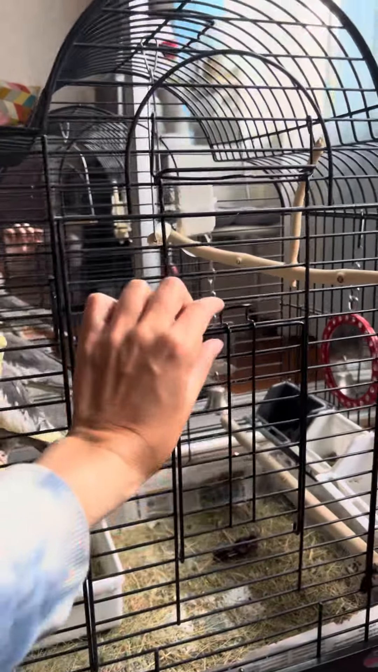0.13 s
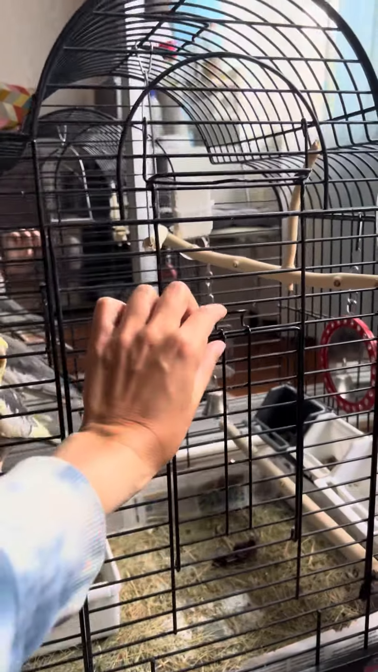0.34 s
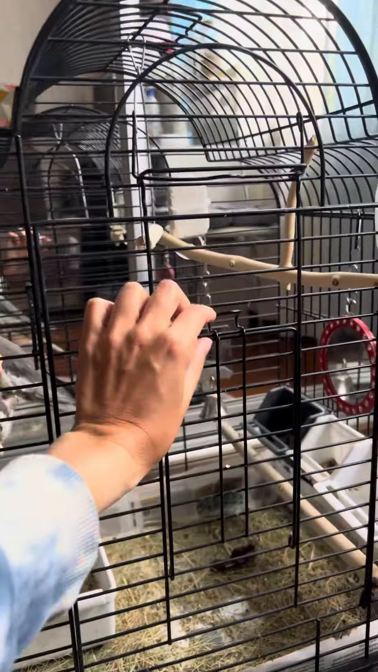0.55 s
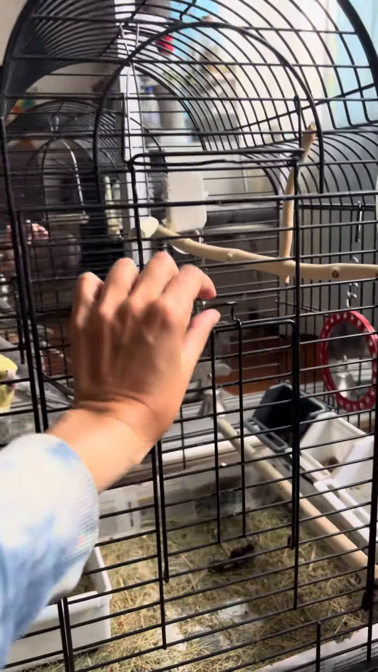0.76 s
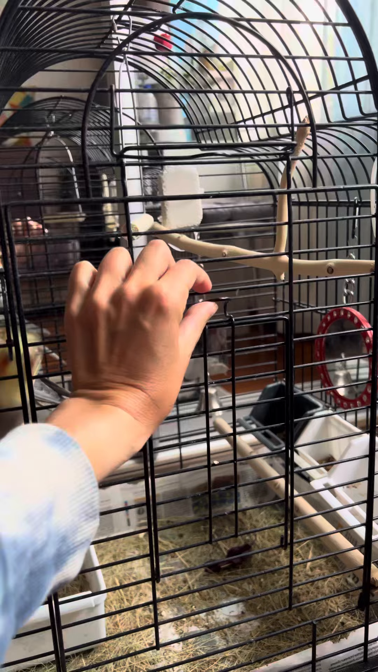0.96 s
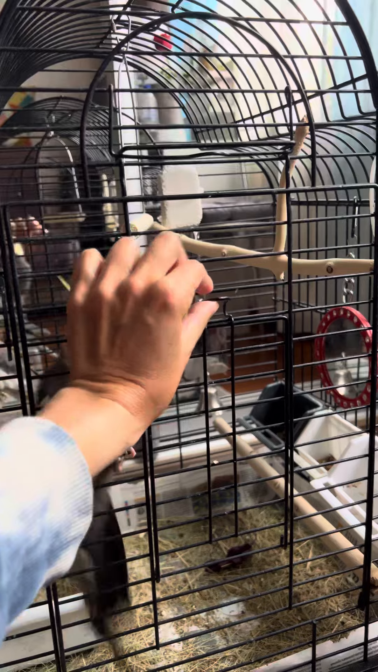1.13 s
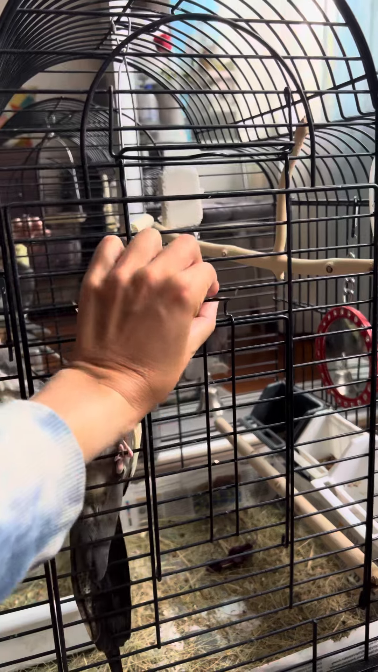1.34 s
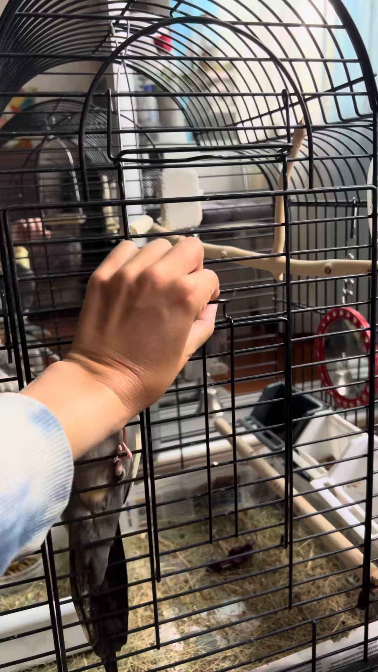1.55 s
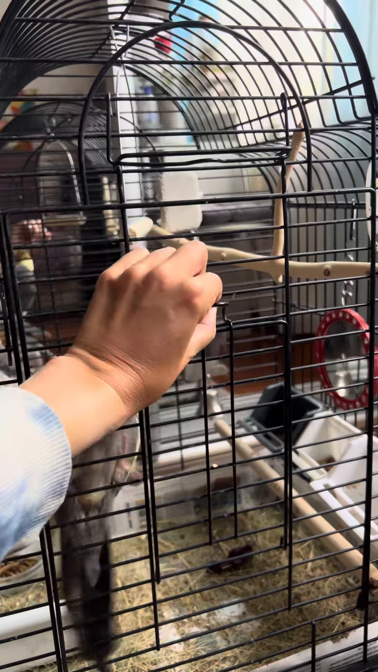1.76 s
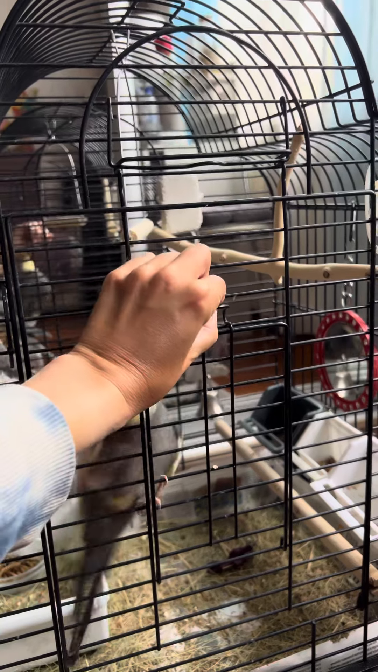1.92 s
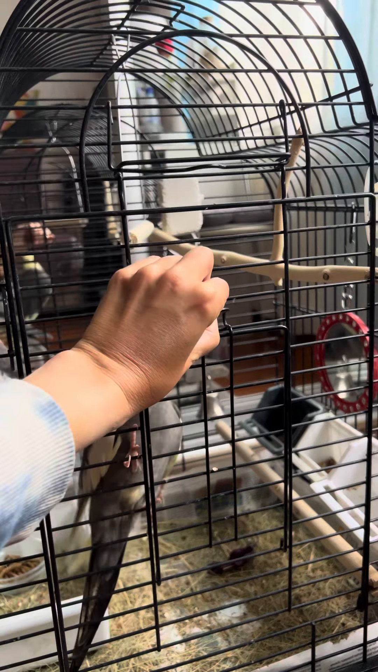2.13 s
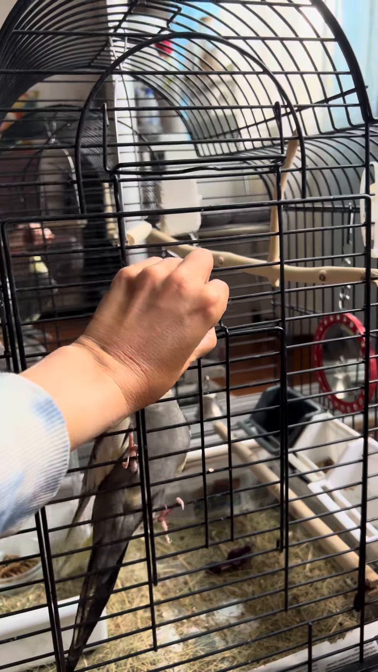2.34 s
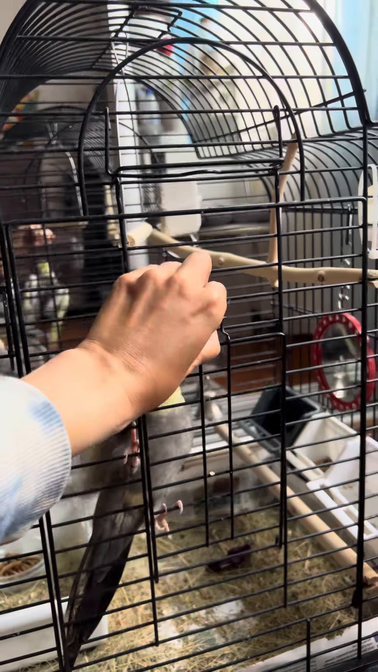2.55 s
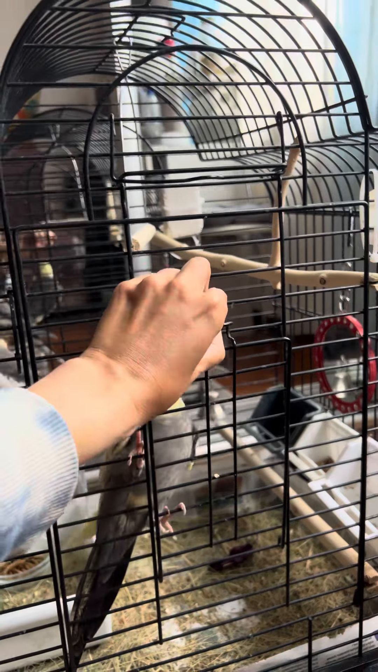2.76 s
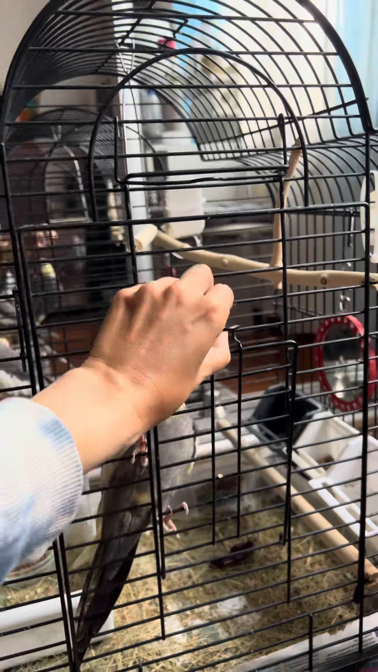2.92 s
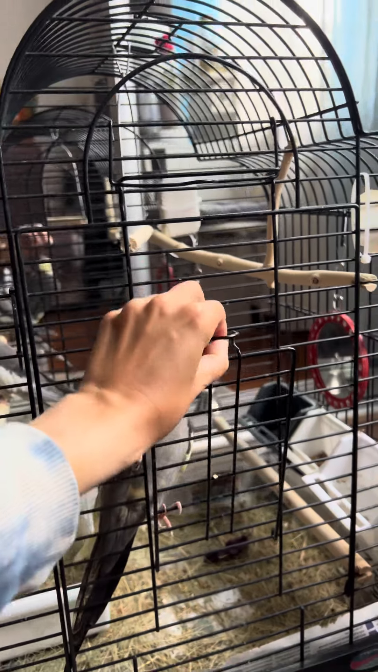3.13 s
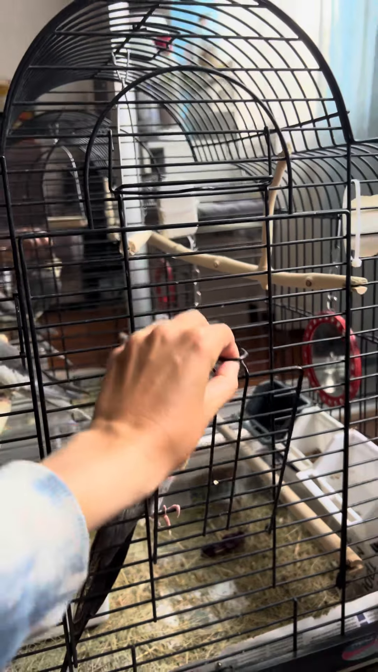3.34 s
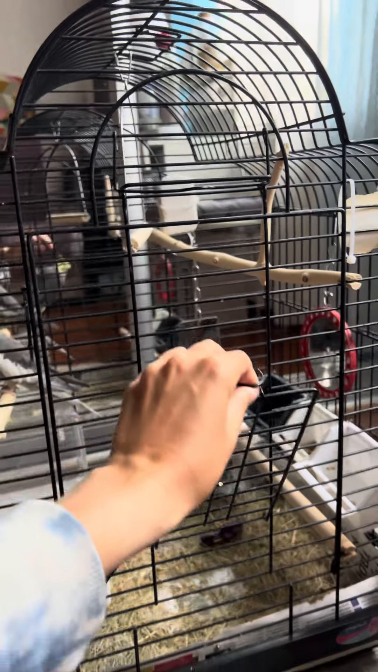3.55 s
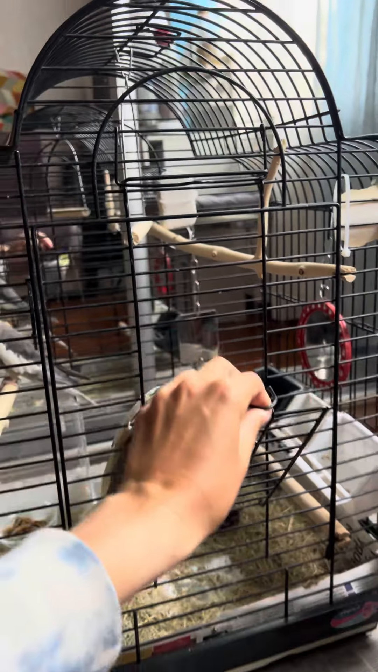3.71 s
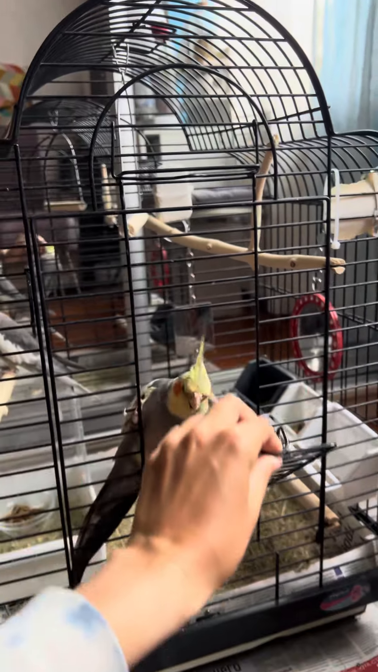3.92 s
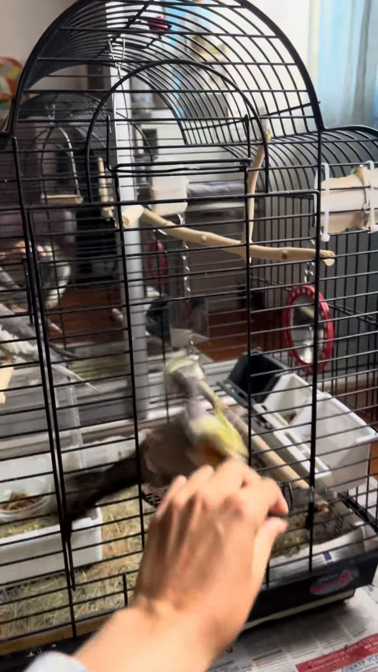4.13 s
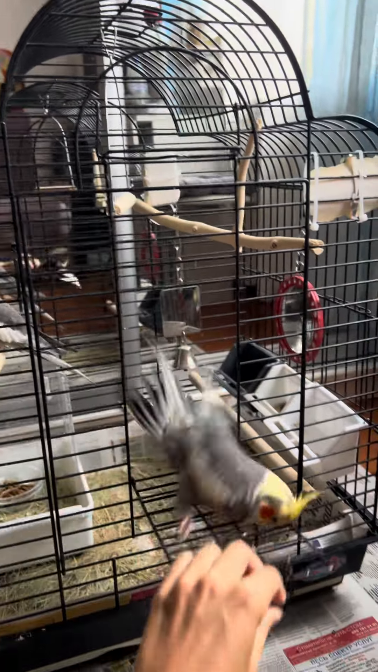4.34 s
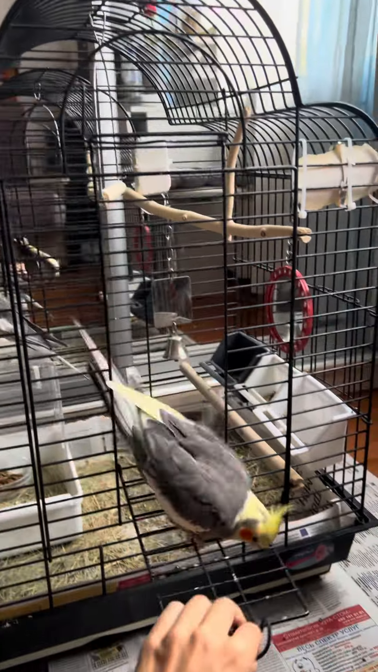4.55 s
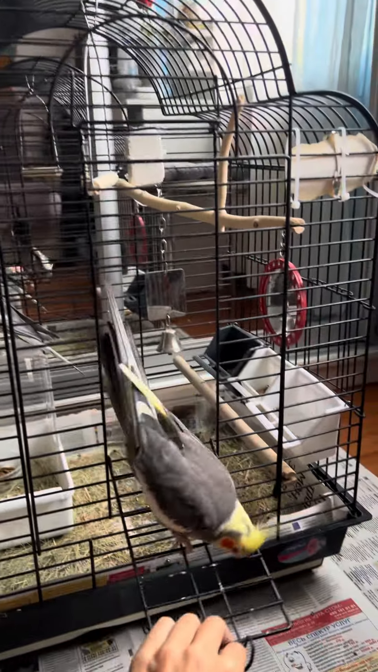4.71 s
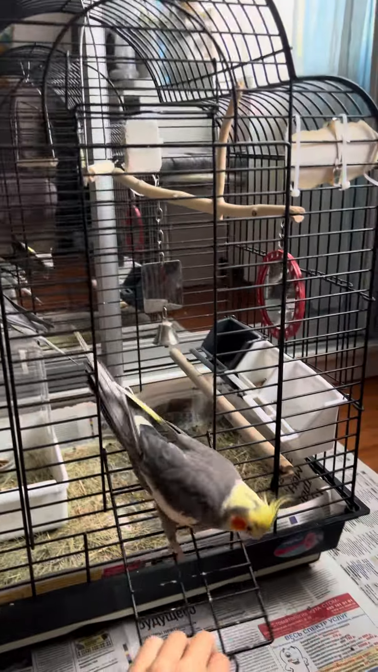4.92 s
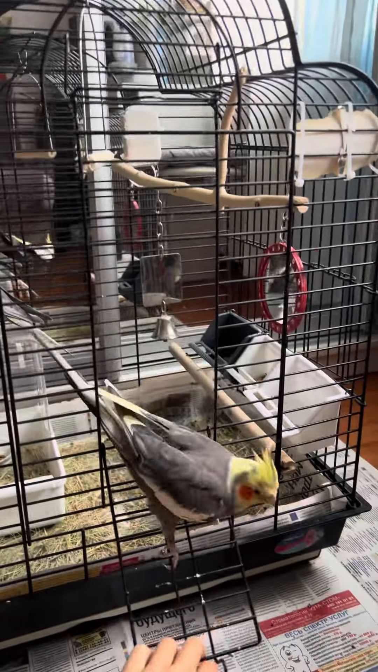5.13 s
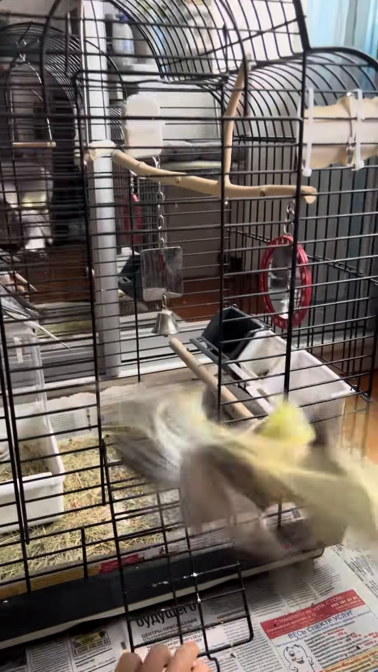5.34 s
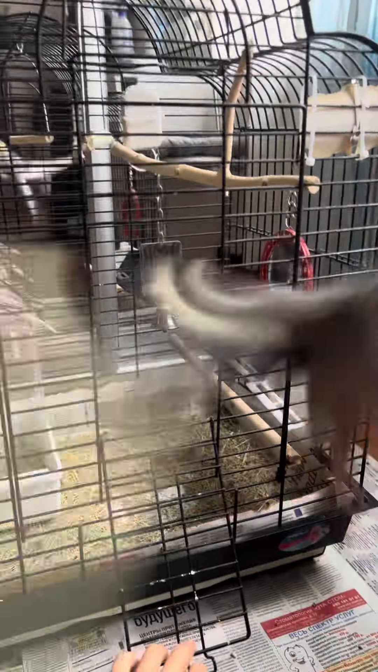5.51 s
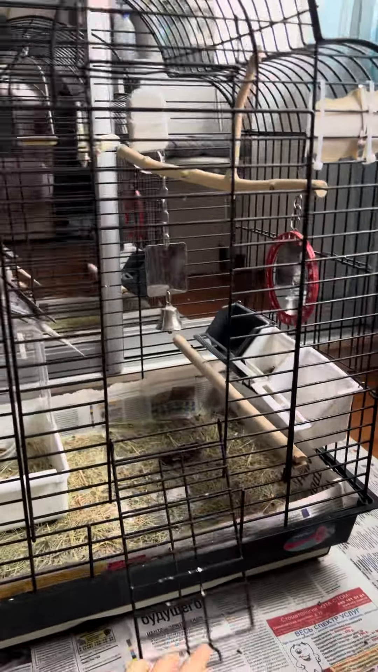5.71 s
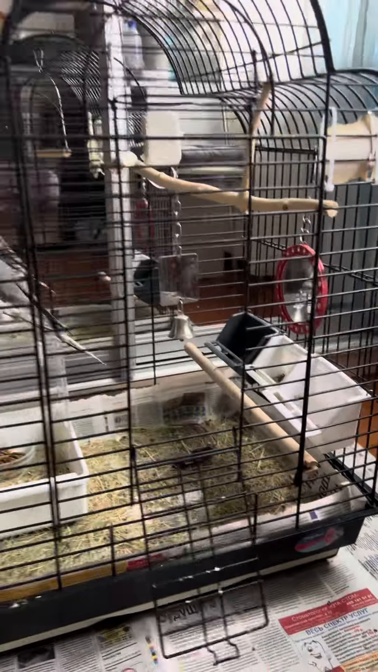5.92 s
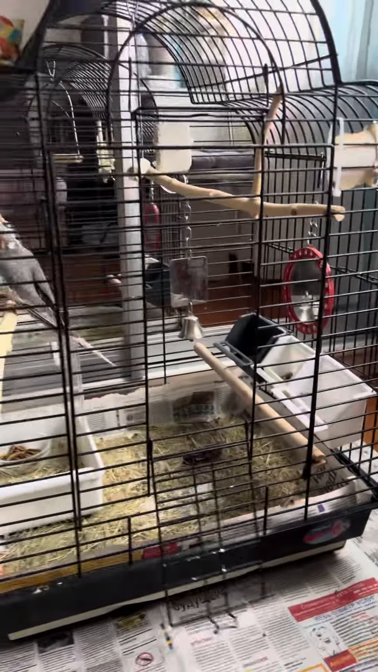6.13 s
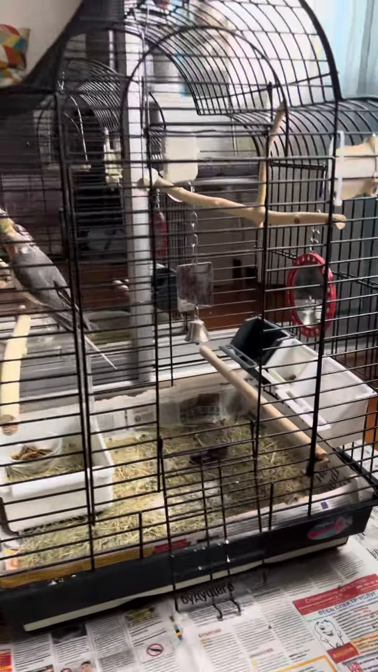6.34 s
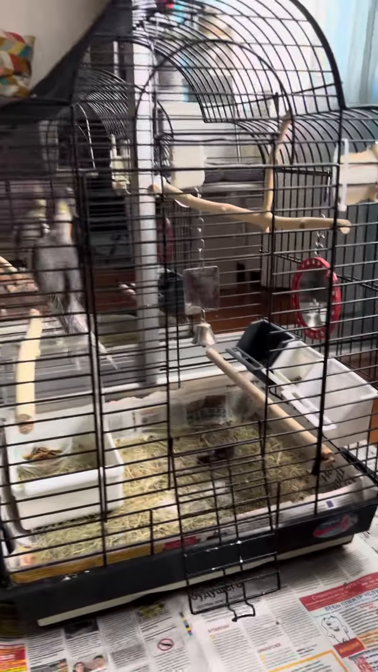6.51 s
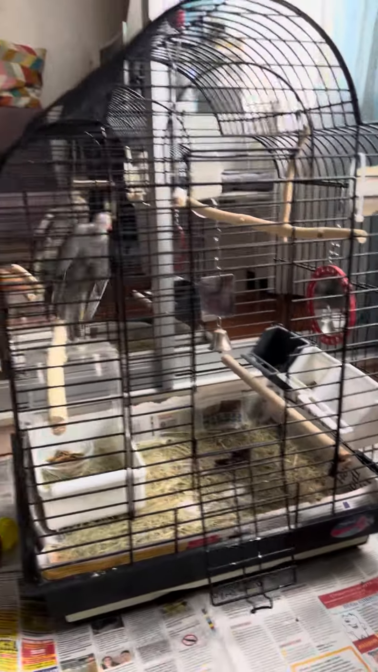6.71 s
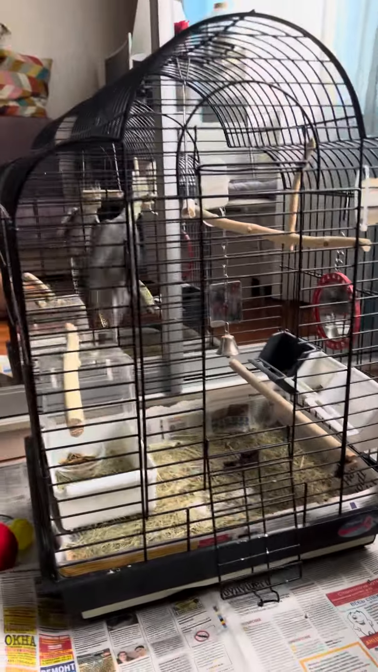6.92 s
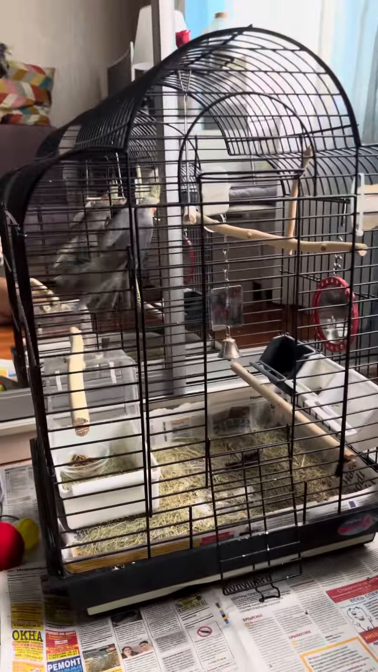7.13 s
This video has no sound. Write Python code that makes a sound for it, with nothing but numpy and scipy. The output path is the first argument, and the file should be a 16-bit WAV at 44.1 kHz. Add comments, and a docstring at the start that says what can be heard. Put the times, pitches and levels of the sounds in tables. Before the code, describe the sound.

Light metallic cage rattles, one sharp clank, a pause, then a bird's sudden wing burst buffets the microphone and fades into fluttering and wire pings.

```python
"""Cage bird passing a microphone

A hand unlatches and lowers the wire door of a cockatiel's cage in a humming room: knocks excite decaying
bar modes, and scrapes are grainy noise. The bird takes off and flies past the microphone: its feathers are
throbbing noise, its close wing strokes brief pressure swings, and one wing tip clips the microphone with a
snap and a falling thump. Then it flutters and scrabbles on wire further away."""
import sys
import numpy as np
from scipy import signal
from scipy.fft import rfft, irfft
from scipy.io import wavfile
from scipy.ndimage import uniform_filter1d

SR = 44100
rng = np.random.default_rng(int(sys.argv[2]) if len(sys.argv) > 2 else 0)


def materialize(psi):
    """Save the field psi as 16-bit PCM at rate SR to the path in sys.argv[1].

    A 1-D psi becomes a single channel; in a 2-D psi each row is a channel.
    """
    bounded = np.clip(np.atleast_2d(psi).T, -1, 1)
    quanta = np.round(bounded * 32767).astype(np.int16)
    wavfile.write(sys.argv[1], SR, quanta)


N = 316197
TIME = np.arange(N) / SR

TIP_S = 5.5972  # moment a wing tip clips the microphone

# spectrum of the snap on the casing: pitch_hz [Hz], level_db [relative dB per Hz]
SNAP_SPECTRUM = [(200, -30), (600, -7), (900, -12), (1300, 6), (1900, -2.5), (2700, -4.5), (4800, -2.5),
                 (5900, -18), (9500, -16), (12000, -23), (16000, -29)]


def wing_tip(thump_db=-1.2, snap_db=-3.0, start_hz=560, fall_s=0.0032, late_s=0.00189,
             length_s=0.0078, spread_s=0.000705, bounce_s=.00093):
    """Impact and dispersion: a snap with its rebound, and a thump whose pitch plunges as pressure lets go."""
    t = TIME[:2048]
    hz = np.fft.rfftfreq(2048, 1 / SR)
    # the integral of start_hz / (1 + t / fall_s), slightly higher at the right port
    turns = start_hz * fall_s * np.log(1 + t / fall_s) * np.array([[1], [1.015]])
    thump = -np.sin(2 * np.pi * turns) * np.exp(-(t / length_s) ** 3)
    # bending waves in the casing are dispersive: the treble arrives first
    phase_lag = 4 * np.pi * spread_s * np.sqrt(1000 * hz) * np.array([[1], [.94]])
    snap = irfft(amp(read(SNAP_SPECTRUM, hz)) * np.exp(-1j * phase_lag))[:, :512]
    snap *= amp(snap_db) / abs(snap).max()
    out = np.zeros((2, N))
    add(out, TIP_S, snap)
    add(out, TIP_S + bounce_s, -snap)
    add(out, TIP_S + late_s, amp(thump_db) * thump)
    return out


# gusts of single wing strokes: start_s [s], level_db [dB, gain of the swing], swing_hz [Hz], length_s [s]
STROKES = [(5.425, -20, 62, 0.028), (5.513, -1.5, 65, 0.033), (5.582, -15, 154, 0.015),
           (5.609, -13.5, 11, 0.032), (5.673, -25.5, 440, 0.0094), (5.674, -34.5, 1000, 0.012),
           (5.799, -21.5, 190, 0.018), (5.866, -14, 127.6, 0.033), (5.902, -15, 310, 0.011),
           (5.907, -12.5, 108, 0.028), (5.954, -26, 310, 0.01)]


def gusts(skew=0.49, rough_db=-24, lead_s=0.00036):
    """Near-field pressure: a close wing stroke sucks and pushes the diaphragm, the right port leading."""
    out = np.zeros((2, N))
    for start_s, level_db, swing_hz, length_s in STROKES:
        t = np.arange(0, length_s, 1 / SR)
        push = np.sin(np.pi * (t / length_s) ** abs(skew))  # rises faster than it falls
        eddies = noise(EDDY_SPECTRUM, size=SR)[:, :len(t)]
        swing = np.sin(2 * np.pi * swing_hz * (t + np.array([[0], [lead_s]])))
        add(out, start_s, amp(level_db) * push * (amp(rough_db) * eddies - swing))
    return out


# spectra of slow and of small-scale turbulence: pitch_hz [Hz], level_db [relative dB per Hz]
RUMBLE_SPECTRUM = [(15, -18), (35, -12.5), (58, 11.5), (90, -7), (140, -8.5), (250, -61), (600, -86)]
EDDY_SPECTRUM = [(60, -3), (150, 12.5), (280, 5), (450, 2), (700, -17.5), (1200, -23), (3000, -71)]
# wakes at the microphone when the bird is close: start_s [s], hold_s [s],
# rumble_db [dB before trim], eddies_db [dB before trim], rumble_fade [dB per s]
CLOSE_WAKES = [(5.315, 0.26, -33, -47, 120), (5.5, .1, -30, -36, 150), (5.614, 0.079, -26, -32, 330),
               (5.803, 0.11, -20.5, -26.5, 85)]
WAKE_RISE_S, EDDY_FADE_RATIO = 0.0079, 2.03  # small eddies die faster than the rumble
FAR_WAKE_DB = 0.5  # rumble relative to the whoosh column of a flutter


def draught(rumble_db=-2, eddies_db=-2):
    """Turbulence: the wake of the wings tumbles over the microphone; distant flutters only stir it."""
    slow = amp(FAR_WAKE_DB) * flutter(axis=3, fade=WHOOSH_FADE_DB_PER_S)
    quick = 0
    for start, hold, low_db, eddy_db, fade in CLOSE_WAKES:
        slow = np.maximum(slow, amp(low_db) * swell(start, hold, WAKE_RISE_S, fade))
        quick = np.maximum(quick, amp(eddy_db) * swell(start, hold, WAKE_RISE_S, fade * EDDY_FADE_RATIO))
    rumble = steady(noise(RUMBLE_SPECTRUM, size=N), size=1800) * slow
    eddies = steady(noise(EDDY_SPECTRUM, size=N), size=900) * quick
    return amp(rumble_db) * rumble + amp(eddies_db) * eddies


# spectra of brushing feathers and of fanned air: pitch_hz [Hz], level_db [relative dB per Hz]
SWISH_SPECTRUM = [(1180, -26), (2000, -11), (2760, -7.5), (3400, -6.5), (5350, -8), (9410, -3),
                  (12300, -19.5), (14900, -14), (16000, -16)]
WHOOSH_SPECTRUM = [(120, -3.5), (300, 2.5), (430, 4), (700, 0), (1000, -2), (1400, -1), (2100, -2.5),
                   (2700, -18), (5000, -86)]
BEATS_PER_S = 12.5
TAKEOFF_SWISH_DB, TAKEOFF_WHOOSH_DB = -45, -48  # before trim
SWISH_FADE_DB_PER_S, WHOOSH_FADE_DB_PER_S = 80, 38
TAKEOFF_S, WHOOSH_LAG_S = 5.254, 0.027


def feathers(swish_db=-2, whoosh_db=-1, beat_db=0.9, grain_db=2.0, uneven_db=1.45):
    """Amplitude modulation: swish and whoosh throb with the wingbeat; barbs catching make the swish grainy."""
    beat = beat_db * np.cos(2 * np.pi * BEATS_PER_S * (TIME - TIP_S))
    grain = grain_db * unit(uniform_filter1d(rng.standard_normal(N), size=90))
    brushing = flutter(axis=2, fade=SWISH_FADE_DB_PER_S)
    brushing = brushing + amp(TAKEOFF_SWISH_DB) * takeoff(TAKEOFF_S)
    fanning = flutter(axis=3, fade=WHOOSH_FADE_DB_PER_S)
    fanning = fanning + amp(TAKEOFF_WHOOSH_DB) * takeoff(TAKEOFF_S + WHOOSH_LAG_S)
    swish = noise(SWISH_SPECTRUM, size=N) * brushing * amp(swish_db + grain)
    whoosh = noise(WHOOSH_SPECTRUM, size=N) * fanning * amp(whoosh_db)
    # no two flaps are alike
    wander = uniform_filter1d(uniform_filter1d(rng.standard_normal(N), size=700), size=200)
    return (swish + whoosh) * amp(beat + uneven_db * unit(wander))


OPENING_S, PASSED_DB_PER_S = 0.017, 1500  # rise as the wings open, fade once the bird has passed


def takeoff(start):
    """Envelope of a source in flight: gain from the cage door to the microphone."""
    return swell(start, TIP_S - start, OPENING_S, PASSED_DB_PER_S)


# bouts of fluttering against the bars: start_s [s], hold_s [s],
# swish_db [dB before trim], whoosh_db [dB before trim]
FLUTTER_BOUTS = [(4.1, .13, -63, -63), (5.679, .1, -62, -57), (5.806, 0.044, -49, -43.5),
                 (6.071, 0.067, -49, -41.5), (6.345, 0.066, -47.5, -42.5), (6.491, 0.16, -49.5, -45),
                 (6.746, .12, -50.5, -47.5), (7.004, .03, -50, -57), (7.115, 0.056, -50.5, -61)]
FLUTTER_RISE_S = 0.023


def flutter(axis, fade):
    """Masking of overlapping bouts: the strongest one sets the gain, from one of their level columns."""
    bouts = [amp(row[axis]) * swell(row[0], row[1], FLUTTER_RISE_S, fade) for row in FLUTTER_BOUTS]
    return np.max(bouts, axis=0)


# spectra of the bright clatter and of the low tray: pitch_hz [Hz], level_db [relative dB per Hz]
CLATTER_SPECTRUM = [(300, -20), (1200, -3), (2500, -6), (4000, -4), (5300, -4), (7000, -1.5), (9500, 1.5),
                    (10500, -4.5), (11500, -26), (13000, -17.5), (14500, -14.5), (16000, -13)]
TRAY_SPECTRUM = [(40, -31.5), (90, -5), (200, -11), (300, -14), (430, -0.5), (650, -9), (950, -13),
                 (1300, -11), (2000, -14.5), (3000, -29), (8000, -45)]
# strongest modes of the bars: pitch_hz [Hz, before detuning], level_db [relative dB], t60_s [s]
WIRE_MODES = [(368, -5, 2.73), (452, 6, 1.4), (618, 0, .9), (703, -2.5, 1.1), (872, -4, 1.67),
              (1045, -10, 2.03), (1254, -7.5, 0.61), (1500, -23.5, 1.2), (1933, -4.5, 1.67),
              (2345, -7.5, 1.15), (7060, -10.5, .45), (7500, -11.5, 0.77)]
# knocks on the cage wires: start_s [s], clatter_db [dB gain], tray_db [dB gain], tick_db [dB gain],
# hardness_db [dB of extra top treble]
CAGE_KNOCKS = [(.453, -64, -54, -80, -18), (.572, -63.5, -61, -85, -18), (.872, -57, -55.5, -80, -15),
               (.915, -51.5, -50.5, -75, -22), (.95, -53, -50, -78, -4), (1.075, -47.5, -50.5, -56, -9),
               (1.123, -58, -50, -39.5, 13), (1.155, -57, -59, -46, 13), (1.19, -72, -55, -75, -5),
               (1.377, -64, -68, -58, -12), (1.655, -52.5, -47.5, -57, -2), (1.711, -50, -55, -49, 0),
               (1.733, -50, -52, -45, 2), (1.876, -60, -58, -52.5, 13.5), (1.987, -47, -43, -38.5, -14.5),
               (2.086, -53.5, -55, -59, -10), (2.361, -30.5, -33, -36, 11.5), (2.365, -27, -30.5, -21, 7.5),
               (2.395, -48, -33, -50, -3.5), (2.452, -50, -56, -29.5, -7), (2.511, -42, -52, -32, 5),
               (2.588, -45.5, -63, -37, -4.5), (4.045, -56, -41.5, -57, 11.5),
               (4.147, -49.5, -50.5, -48.5, 10), (4.2016, -47, -49.5, -31.5, 9.5),
               (4.405, -61, -52, -57, 10), (4.428, -61, -51, -62, 0), (4.561, -56.5, -53, -49, -9.5),
               (4.745, -61.5, -57, -60, 6.5), (5.255, -47, -69, -34, 6), (5.285, -56, -50, -55, -4),
               (5.514, -60, -54, -33.5, 11), (5.8, -45, -58, -49, 4), (5.928, -46, -62, -44, -2),
               (6.069, -40.5, -52, -55, -14), (6.095, -45, -40, -54, -5.5), (6.26, -47, -60, -45, 3),
               (6.38, -42.5, -45, -50, -10), (6.491, -42.5, -54, -36.5, -10), (6.6, -43, -46, -47, -4),
               (6.84, -48.5, -57, -39, 6.5), (6.975, -48, -60, -49, 6)]


def cage(wires_db=-19, bars_db=-4, wash_db=-3, tick_s=0.0037, chatter_db=-8, chatter_s=.03,
         detune=0.0101, left_db=0.84):
    """Modal excitation: a knock is a tick with chatter, a clatter of bars, a tray boom and singing wires."""
    out, t = np.zeros((2, N)), TIME[:SR]
    hz, mode_db, t60 = np.transpose(WIRE_MODES)[:, :, None]
    fading = (amp(mode_db) * np.exp(-np.log(1000) / t60 * t)).astype(np.float32)
    build_s = .0035
    spots = []  # struck places, used in turn
    for _ in range(13):
        bars = many_bars() * (1 - np.exp(-t / build_s))
        wash = ringing(CLATTER_SPECTRUM, rise=build_s)
        spots.append(amp(bars_db) * bars + amp(wash_db) * wash)
    for k, (start_s, clatter_db, tray_db, tick_db, hard_db) in enumerate(CAGE_KNOCKS + touches()):
        pitch = hz * (1 + detune * rng.standard_normal(hz.shape))  # no two bars are quite alike
        signs = rng.choice([-1., 1.], len(WIRE_MODES))
        wires = signs @ (fading * np.sin((2 * np.pi * pitch * t).astype(np.float32)))
        # loose wires touch again at chance moments after the first contact
        contacts = (rng.random(SR) < 110 / SR) * rng.random(SR) * amp(chatter_db) * np.exp(-t / chatter_s)
        contacts[0] = 1
        tick_gain = signal.lfilter([1], [1, -np.exp(-1 / (tick_s * SR))], contacts)
        tick = noise(CLATTER_SPECTRUM, size=SR) * tick_gain
        clatter = spots[k % len(spots)] + amp(wires_db) * wires
        tray = amp([[left_db], [-left_db]]) * ringing(TRAY_SPECTRUM, rise=0.0026)
        knock = amp(clatter_db) * clatter + amp(tray_db) * tray + amp(tick_db) * tick
        add(out, start_s, contact_colour(knock, hard_db))
    return out


# light touches of claws and latch, in dB above the level of the movement along the bars
TOUCH_DB, TOUCH_TRAY_DB, TOUCH_TICK_DB, TOUCH_HARD_DB, TOUCH_SPREAD_DB = -8, -11.5, -3, 3, 4.5


def touches(count=2):
    """Random contact: each flutter and each slide of the latch taps the wires at a few chance moments."""
    rows = []
    for start, hold, db, *_ in FLUTTER_BOUTS + SCRAPE_SLIDES:
        for k in range(count):
            start_s = start + hold * (k + rng.random()) / count
            size = db + TOUCH_SPREAD_DB * rng.standard_normal()
            rows.append((start_s, size + TOUCH_DB, size + TOUCH_TRAY_DB, size + TOUCH_TICK_DB, TOUCH_HARD_DB))
    return rows


# decay of undamped bars: pitch_hz [Hz], t60_s [s]
BAR_DECAY = [(300, 1.2), (1000, 0.93), (2500, 0.99), (5000, 0.72), (9000, 0.45), (15000, 0.24)]


def many_bars(count=170, apart=0.8):
    """Modal synthesis: a blow shakes its own handful of bar modes; high ones reach the ports out of step."""
    t = TIME[:SR].astype(np.float32)
    hz = 400 + 15000 * rng.random(count) ** 1.2
    decay_rate = (np.log(1000) / read(BAR_DECAY, hz)).astype(np.float32)[:, None]
    decay = np.exp(-decay_rate * t)
    angle = (2 * np.pi * hz).astype(np.float32)[:, None] * t
    port_shift = apart * np.sqrt(hz / 2000) * rng.standard_normal((2, count))
    phase = 2 * np.pi * rng.random(count) + port_shift
    size = amp(read(CLATTER_SPECTRUM, hz)) * (1 + rng.random(count))
    sine_part = (size * np.cos(phase)).astype(np.float32)
    cosine_part = (size * np.sin(phase)).astype(np.float32)
    modes = sine_part @ (decay * np.sin(angle)) + cosine_part @ (decay * np.cos(angle))
    return modes / np.sqrt(count)


# how long cage and room ring after a knock: pitch_hz [Hz], t60_s [s]
RING_DECAY = [(100, 1), (450, 1), (1000, 0.86), (2500, 0.58), (5000, 0.48), (9000, 0.19), (15000, 0.35)]


def ringing(spectrum, rise):
    """Diffuse reverberation: a dense noise tail with its own decay time at each frequency."""
    hz, t, z = signal.stft(noise(spectrum, size=SR), SR, nperseg=256)
    decay = amp(-60 * t / read(RING_DECAY, hz)[:, None])
    tail = signal.istft(z * decay, SR, nperseg=256)[1][:, :SR]
    return tail * (1 - np.exp(-TIME[:SR] / rise))


# where hardness acts: pitch_hz [Hz], share [0 to 1]
HARDNESS_SHARE = [(7000, 0.018), (10000, 0.57), (11500, 1)]


def contact_colour(x, hard_db, ripple_db=3.5):
    """Contact stiffness: hard contacts reach higher, and each blow favours its own groups of modes."""
    hz = np.fft.rfftfreq(x.shape[1], 1 / SR)
    ripple = unit(uniform_filter1d(uniform_filter1d(rng.standard_normal(len(hz)), size=150), size=110))
    db = hard_db * read(HARDNESS_SHARE, hz) + ripple_db * ripple * np.clip(hz / 2000, 0, 1)
    log_gain = np.log(amp(np.r_[db, db[-2:0:-1]]))
    causal = np.exp(np.conj(signal.hilbert(log_gain)))[:len(hz)]  # minimum phase
    return irfft(rfft(x) * causal, x.shape[1])


# single bars twanged by a finger or a claw: start_s [s], pitch_hz [Hz], level_db [dB], t60_s [s]
BAR_TWANGS = [(1.185, 1060, -51, 0.9), (1.185, 1133, -52, 0.46), (1.155, 9550, -45, 0.14),
              (1.733, 14600, -54, 0.19), (2.364, 7200, -42, 0.85), (6.0, 2100, -54.5, 1.4),
              (6.26, 2050, -56, 1.9), (6.28, 9100, -48, 0.34), (6.6, 2040, -52, 0.91),
              (6.84, 2014, -50.5, 1.2), (6.84, 9140, -44.5, 0.3), (6.85, 1038, -60, 2.2),
              (7.04, 9530, -52, 0.26)]


def twangs(split=0.0044, twin=.5):
    """Beating: a bar swings in two planes at slightly different pitches."""
    out, t = np.zeros((2, N)), TIME[:SR]
    for start_s, hz, level_db, t60 in BAR_TWANGS:
        phase = 2 * np.pi * rng.random((2, 1))
        first_plane = np.sin(2 * np.pi * hz * t)
        second_plane = twin * np.sin(2 * np.pi * hz * (1 + split) * t + phase)
        envelope = amp(level_db - 60 * t / t60) * (1 - np.exp(-t / .002))
        add(out, start_s, (first_plane + second_plane) * envelope)
    return out


# fingers and latch sliding along the bars: start_s [s], hold_s [s], level_db [dB before trim]
SCRAPE_SLIDES = [(0.912, 0.032, -59), (1.056, 0.052, -50), (1.685, .06, -60), (2.362, 0.016, -49.5),
                 (3.967, 0.044, -71)]
SCRAPE_RISE_S, SCRAPE_FADE_DB_PER_S = 0.01185, 300


def scrapes(scrape_db=-1, grain_db=4.5):
    """Stick-slip friction: wire drags on wire in small uneven slips."""
    slips = unit(uniform_filter1d(rng.standard_normal(N), size=130))
    drag = sum(amp(db) * swell(start, hold, SCRAPE_RISE_S, SCRAPE_FADE_DB_PER_S)
               for start, hold, db in SCRAPE_SLIDES)
    return noise(CLATTER_SPECTRUM, size=N) * drag * unit(amp(grain_db * slips)) * amp(scrape_db)


# spectrum of the ventilation: pitch_hz [Hz], level_db [relative dB per Hz]
AIR_SPECTRUM = [(20, -27.5), (40, 3.5), (100, 9), (140, 5.5), (175, -4.5), (380, -2), (700, -14.5),
                (1400, -18), (1850, -9), (2250, -18.5), (2700, -29), (3700, -23.5), (4800, -27.5),
                (5400, -33), (9800, -33), (12000, -48)]
AIR_DB = -60  # level of the air above 160 Hz
# hums of appliances: pitch_hz [Hz, mean], level_db [dB rms before wavering]
APPLIANCE_HUMS = [(49.2, -49), (120.1, -53), (308, -81), (393, -70.5)]


def room(waver=0.088):
    """Stationary background: ventilation noise and gently wavering hums."""
    air = noise(AIR_SPECTRUM, size=N)
    above_hum = signal.sosfilt(signal.butter(4, 160, "high", fs=SR, output="sos"), air)
    out = air / above_hum.std() * amp(AIR_DB)
    for hz, db in APPLIANCE_HUMS:
        # slow noise moves the level and the phase
        level, drift = noise([(1, 0), (4, -10), (12, -50), (100, -120)], size=N)
        tone = np.sin(2 * np.pi * hz * TIME + 2 * waver * drift)
        out = out + amp(db) * np.sqrt(2) * (1 + waver * level) * tone
    return out


# likeness of the left and right ports: pitch_hz [Hz], correlation [0 to 1]
PORT_LIKENESS = [(50, 1), (300, 0.91), (1000, 0.39), (2500, 0.76), (5000, 0.29), (12000, .05)]


def noise(spectrum, size):
    """Spatial coherence: coloured noise of rms 1 at two ports, most alike in the bass."""
    hz = np.fft.rfftfreq(size, 1 / SR)
    a, b = rfft(rng.standard_normal((2, size)))
    same = np.clip(read(PORT_LIKENESS, hz), -1, 1)
    mid, side = a * np.sqrt(1 + same), b * np.sqrt(1 - same)
    return unit(irfft(np.array([mid + side, mid - side]) * amp(read(spectrum, hz)), size))


def swell(start, hold, rise, fade):
    """Exponential envelope: gain grows up to the start, holds, then fades at so many dB per second."""
    early = np.maximum(start - TIME, 0)
    late = np.maximum(TIME - start - hold, 0)
    return np.exp(-np.minimum(early / rise + late * fade * np.log(10) / 20, 30))


def steady(x, size):
    """Level normalisation: takes the slow swells out of a noise."""
    return x / np.sqrt(uniform_filter1d((x ** 2).mean(0), size) + 1e-6)


def amp(db):
    """Logarithmic level: decibels to gain."""
    return 10 ** (np.asarray(db) / 20)


def unit(x):
    """Effective value: scales to rms 1."""
    return x / np.sqrt(np.mean(x ** 2) + 1e-20)


def read(points, hz):
    """Logarithmic pitch: reads a table on a log-frequency axis."""
    f, value = np.transpose(points)
    return np.interp(np.log(hz + 1), np.log(f + 1), value)


def add(mix, s, sound):
    """Superposition: mixes a sound in at time s."""
    part = mix[:, round(s * SR):][:, :sound.shape[-1]]
    part += sound[..., :part.shape[1]]


def scene():
    """Superposition of bird, cage and room."""
    bird = wing_tip() + gusts() + draught() + feathers()
    return bird + cage() + twangs() + scrapes() + room()


EDGE_HZ = 15950  # band limit


def record(dry):
    """Clipping and band limiting: a ceiling just under full scale, then a low-pass filter."""
    held = np.clip(dry, -.95, .95)
    low_pass = signal.firwin(511, EDGE_HZ, window=("kaiser", 9), fs=SR)
    return signal.oaconvolve(held, low_pass[None], "same")


dry = scene()
out = record(dry)
materialize(out)
```